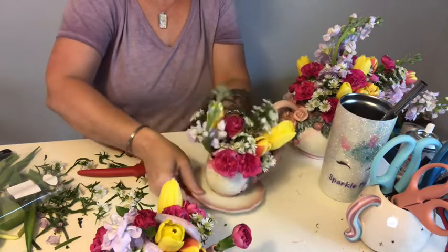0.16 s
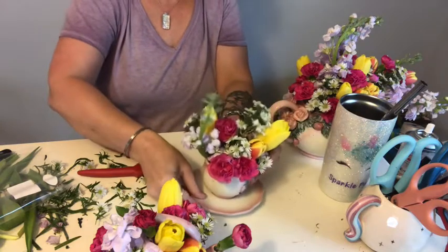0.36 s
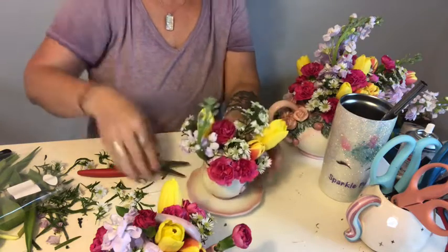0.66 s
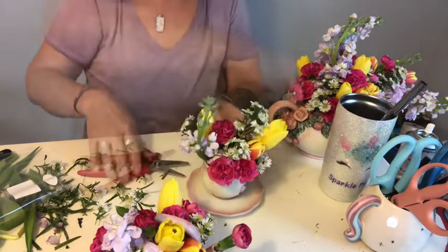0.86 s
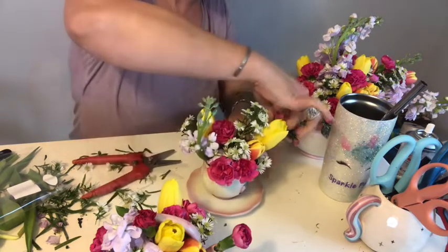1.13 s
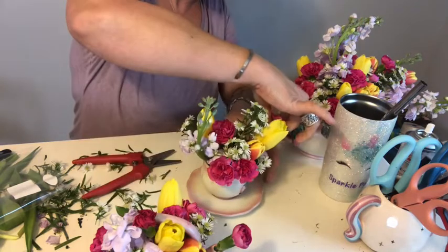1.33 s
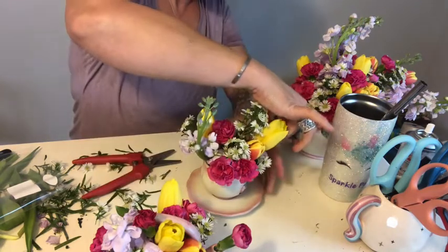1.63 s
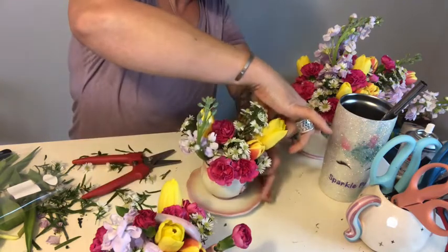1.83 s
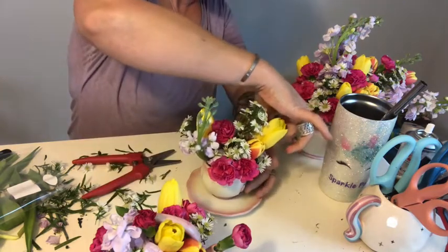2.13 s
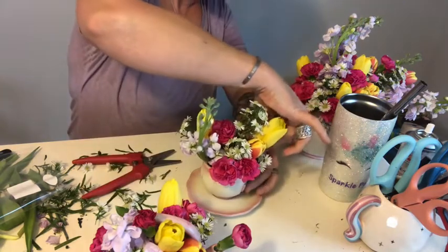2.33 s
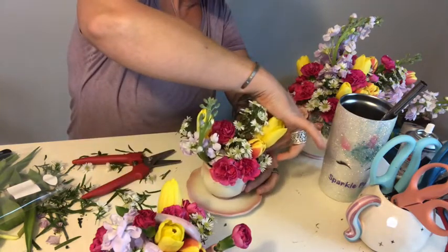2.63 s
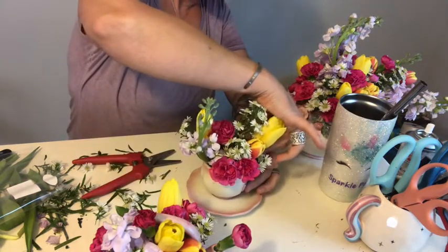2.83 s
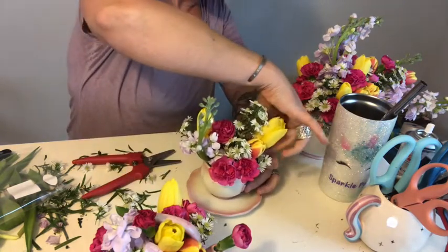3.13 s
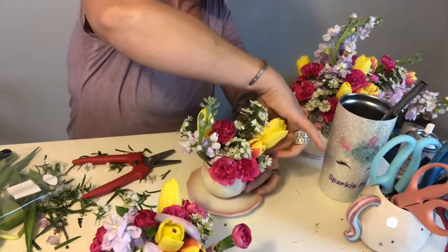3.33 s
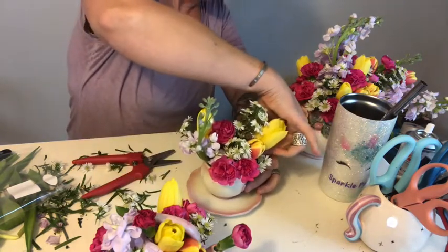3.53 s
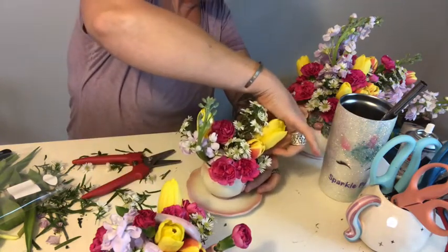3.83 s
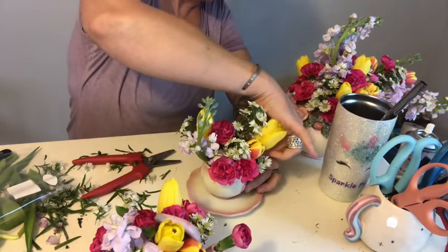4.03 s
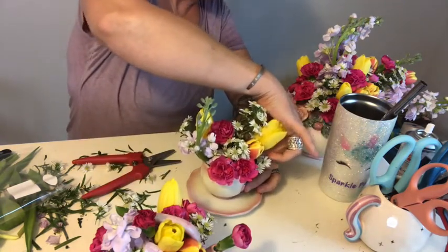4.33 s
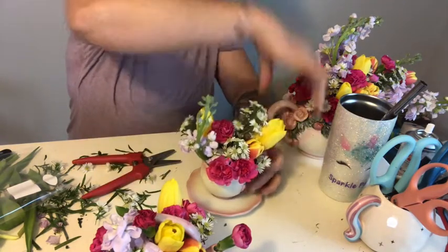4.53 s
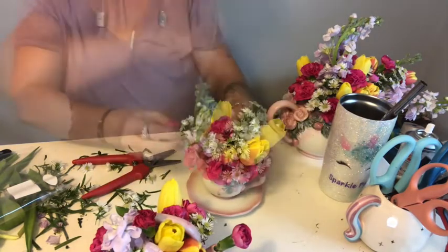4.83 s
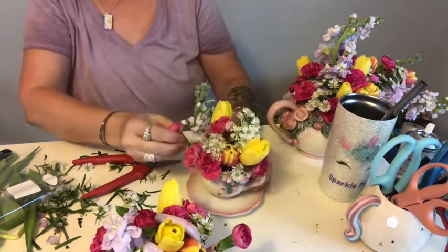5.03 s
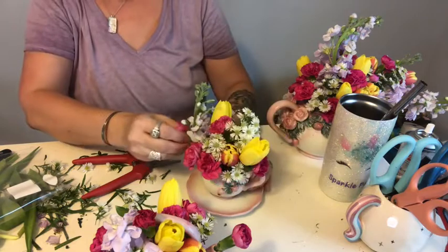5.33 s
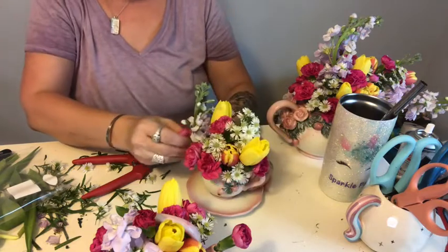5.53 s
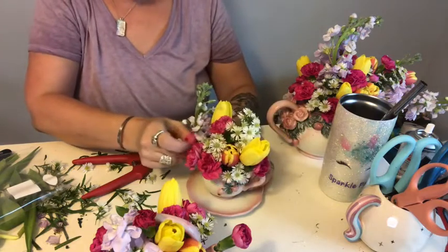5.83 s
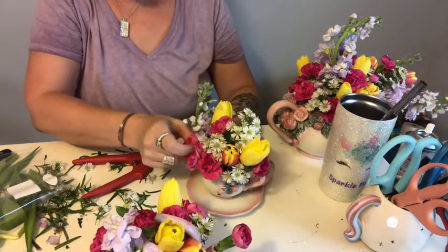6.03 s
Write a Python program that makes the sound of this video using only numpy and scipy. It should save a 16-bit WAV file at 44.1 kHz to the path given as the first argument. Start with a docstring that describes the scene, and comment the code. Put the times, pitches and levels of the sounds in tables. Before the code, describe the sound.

Close porcelain clinks and gritty rocking for two seconds, quiet petal rustling with faint bangle jingles, then sharp china clatter near five seconds.

```python
"""Close on a wooden worktable in a small room, over a fan's steady rumble and beating hum: shaped noise and sines.
A cup packed with flowers drags and clinks on its saucer at once, contacts driving shared china modes; blows ring
the table. A bangle jingles faintly as chattering grains through metal modes, with a few faint, very high tones.
Rocking and clinks go on until about two seconds, then mostly stems and leaves rustle, as patchy coloured grains.
A last flurry peaks near five seconds, and rustling sees it out; decaying noise gives the room's answer."""
import sys
import numpy as np
from scipy import signal
from scipy.fft import rfft, irfft, next_fast_len
from scipy.io import wavfile
from scipy.ndimage import uniform_filter1d, map_coordinates

SR = 44100
rng = np.random.default_rng(int(sys.argv[2]) if len(sys.argv) > 2 else 0)


def boost(x):
    """Linear amplitude factor 10**(x/20) for a level x in decibels (scalar or array-like)."""
    u = np.asarray(x, float) / 20
    return 10 ** u


def digitize_waveform(pressure):
    """Quantize a signal to 16-bit integers and store it at the path in sys.argv[1].

    Rows of a 2-D input are taken as channels; values are limited to [-1, 1].
    """
    field = np.atleast_2d(pressure).T
    bounded = np.clip(field, -1, 1)
    quanta = np.round(bounded * 32767).astype(np.int16)
    wavfile.write(sys.argv[1], SR, quanta)


N = 272160
t = np.arange(N) / SR

# lower modes of cup and saucer, rung by clinks, slides and knocks: centre_hz, width_hz, relative_db
BODY_MODES = [(490, 47, -4.5), (588, 100, -10), (726, 83, -3.5), (860, 110, 2.5), (1016, 170, 3.5),
              (1400, 170, -2.5), (1600, 240, 0), (1842, 330, -5.5)]


def unit(x):
    """Scale to rms 1."""
    return x / np.sqrt(np.mean(np.abs(x) ** 2) + 1e-20)


def along(points, hz):
    """Read (Hz, value) points on a log frequency axis."""
    f, value = np.transpose(points)
    return np.interp(np.log(hz + 1), np.log(f + 1), value)


def filtered(x, response):
    """Multiply the spectrum of x by a complex response of frequency."""
    size = next_fast_len(len(x) + 8192)
    hz = np.fft.rfftfreq(size, 1 / SR)
    return irfft(rfft(x, size) * response(hz), size)[:len(x)]


def ringing(x, modes):
    """Pass x through parallel resonances; a unit impulse leaves energy 1."""
    def bank(f):
        total = 0
        for k, (centre, width, db) in enumerate(modes):
            damping = 1j * f * width
            # neighbouring modes have opposite signs
            total = total + (-1) ** k * boost(db) * damping / (centre * centre - f * f + damping)
        return unit(total)
    return filtered(x, bank)


def coloured(x, spectrum):
    """Shape x to a spectrum, at rms 1."""
    return unit(filtered(x, lambda f: boost(along(spectrum, f))))


def dull(x, top_hz):
    """A soft contact passes little above top_hz: a second-order low-pass."""
    return filtered(x, lambda f: 1 / (1 - (f / top_hz) ** 2 + 1j * np.sqrt(2) * f / top_hz))


def grit(rate, spread_db):
    """Random tiny contacts of unequal size, rate a second, none far over the rest, rms 1."""
    size_db = spread_db * np.minimum(rng.exponential(size=N), 3)
    hits = rng.random(N) < rate / SR
    return unit(hits * rng.standard_normal(N) * boost(size_db))


def strokes(rows, rise_s, stop_db_per_s):
    """One level envelope per stroke: it rises from its start and dies away once its length is over."""
    start, length, db = np.transpose(rows)[:3, :, None]
    rise = np.clip((t - start) / rise_s, 0, 1) ** 2
    after = np.clip(t - start - length, 0, 1)
    return rise * boost(db - stop_db_per_s * after)


def blows(times, db, contact_s, rough=0.2):
    """One sharp push per blow and a rough wake dying over the contact time, which colours the modes anew."""
    u = np.arange(512)
    push = rough * rng.standard_normal((len(times), 512)) * np.exp(-u / (contact_s * SR))
    push[:, 0] = 1
    push *= (boost(db) / np.linalg.norm(push, axis=1))[:, None]
    # the contact closes a moment after first touch
    at = np.round((times + 0.0006) * SR).astype(int)[:, None] + u
    return np.bincount(at.ravel(), push.ravel(), N + 512)[:N]


def background():
    """Steady air and microphone hiss as shaped noise, motor hum as sines."""
    # room air and microphone hiss: frequency_hz, relative_db_per_hz
    air = [(30, -27), (42, -5.5), (65, -0.5), (85, -13.5), (110, -4.5), (190, -4.5), (400, -16.5),
           (500, -15.5), (1000, -22), (1500, -25.5), (2500, -32.5), (7000, -35), (14000, -41.5),
           (16500, -54)]
    # motor tones, the lowest two beating five times a second: frequency_hz, rms_db
    hum_tones = [(53.74, -67), (58.84, -65.5), (120.04, -71)]
    hum = sum(boost(db) * np.sqrt(2) * np.cos(2 * np.pi * hz * t) for hz, db in hum_tones)
    return hum + boost(-60) * coloured(rng.standard_normal(N), air)


def bangle():
    """Thin metal rings chatter: fading grains excite narrow modes, each jingle favouring its own."""
    # jingles, mode level given per pass: start_s, length_s, drive_db, lowest_mode_hz, lowest_mode_db
    jingles = [(0, 0.06, -62.5, 4430, 2), (0.061, 0.035, -43, 4510, 3.5), (.29, 0.095, -73.5, 4540, 9),
               (0.344, 0.074, -66, 4460, 1), (0.637, 0.11, -75, 4430, -9),
               (2.195, 0.092, -69.5, 4300, -3.5), (2.67, .012, -80, 4840, 16.5),
               (2.817, 0.039, -77, 4350, -3), (3.052, 0.026, -59.5, 4220, -1.2),
               (3.472, 0.012, -64, 4240, 3), (4.22, .09, -73.5, 4390, 4), (4.416, 0.028, -67.5, 4200, 0),
               (4.986, 0.11, -63, 4200, -6)]
    # upper modes for one pass: centre_hz, width_hz, relative_db
    upper_modes = [(7050, 160, 0), (9550, 80, -9), (10500, 110, -4), (11400, 110, -8), (12100, 80, -10)]
    out = np.zeros(N)
    grains = grit(rate=1000, spread_db=1.5)
    u = t[:SR // 4]
    for start, length, db, low_hz, low_db in jingles:
        first = round(start * SR)
        at = slice(first, first + len(u))
        # steady for half the length, then fading to nothing
        chatter = np.clip(2 - 2 * u / length, 0, 1) * grains[at]
        favoured = [(hz, width, mode_db + rng.normal(0, 2)) for hz, width, mode_db in upper_modes]
        modes = [(low_hz, 130, low_db)] + favoured
        # twice: clean valleys between the modes
        out[at] += boost(db - 10.5) * ringing(ringing(chatter, modes), modes)
    return out


def high_tones():
    """Faint narrow tones near 15.5 kHz: fine grains through two narrow modes, twice."""
    # tones: start_s, length_s, drive_db
    times = [(.06, .03, -90), (1.865, 0.014, -85), (3.045, .02, -96), (4.99, 0.08, -80)]
    # modes for one pass: centre_hz, width_hz, relative_db
    modes = [(15400, 150, -5), (15700, 60, -1.5)]
    envelope = strokes(times, rise_s=.008, stop_db_per_s=699.5).sum(axis=0)
    return ringing(ringing(envelope * grit(rate=1500, spread_db=2.5), modes), modes)


def rustle():
    """Petals and leaves brush each other: dense fine grains in shifting patches."""
    # brushes, crispness from soft petals 0 to stiff leaves 1: start_s, length_s, level_db, crispness
    brush_rows = [(0, 0.098, -65.5, 0.88), (.2, .35, -72, .33), (0.591, 0.14, -65.5, .35),
                  (.73, 0.085, -60.5, 0.42), (1.105, .45, -80, .4), (1.6, 0.18, -65.5, .4),
                  (1.86, 0.318, -66, 0.24), (2.308, .22, -66.5, 0.37), (2.93, 0.054, -61, .57),
                  (3.14, 0.045, -68, 0.24), (3.88, 0.067, -61.5, .46), (4.19, 0.099, -82, .5),
                  (4.31, 0.03, -55.5, 0.62), (4.434, 0.21, -77.5, 0.43), (5.21, 0.34, -69.5, .5),
                  (5.43, 0.124, -69, 0.51), (5.565, .13, -64, .3), (5.85, 0.099, -71, .65),
                  (6.03, .08, -72.5, .65)]
    # soft petals' colour: frequency_hz, relative_db_per_hz
    petals = [(1200, -30), (2000, -9), (4500, 1), (7000, -6), (10000, -20), (16000, -35)]
    # stiff leaves' colour: frequency_hz, relative_db_per_hz
    leaves = [(1200, -29.5), (2000, -0.5), (5000, -13.5), (10000, -4), (14000, -8), (16500, -15.5)]
    brushes = strokes(brush_rows, rise_s=0.071, stop_db_per_s=250.5)
    level = brushes.sum(axis=0) + 1e-12
    crisp = np.clip(np.transpose(brush_rows)[-1], 0, 1) @ brushes / level
    grains = grit(rate=12000, spread_db=0)
    mixed = (1 - crisp) * coloured(grains, petals) + crisp * coloured(grains, leaves)
    z = signal.stft(mixed, nperseg=512)[2]
    # random gains smoothed across frequency, then time
    patches = uniform_filter1d(rng.standard_normal(z.shape), size=14, axis=0)
    patches = uniform_filter1d(patches, size=10, axis=1)
    depth_db = 1.6
    patchy = signal.istft(z * boost(depth_db * unit(patches)), nperseg=512)[1][:N]
    return level * unit(patchy)


def slides():
    """The cup's foot sticks and slips as it drags: juddering grit pushes body and rim."""
    # drags over the saucer: start_s, length_s, body_drive_db, rim_against_body_db
    drags = [(0.028, 0.12, -48.5, -1), (0.143, 0.082, -51.5, -0.5), (0.575, 0.15, -56, -8.5),
             (0.72, 0.099, -53, -4), (1.065, .15, -59, -6), (1.266, 0.067, -52, -0.5),
             (1.33, 0.085, -58, -4.5), (1.468, 0.2, -49.5, -8), (1.66, 0.1, -56.5, -3),
             (1.875, 0.054, -69, 9), (1.942, 0.31, -67, -12), (4.498, .05, -56, -4),
             (4.562, 0.074, -53, -8), (4.67, 0.07, -60.5, 0.7), (4.775, 0.033, -66.5, -0.5),
             (4.876, 0.21, -59, -18), (4.968, 0.097, -53.5, 9), (5.055, 0.11, -70, 5)]
    judder_db, judders_per_s = 4, 45
    judder = map_coordinates(rng.standard_normal(500), [t * judders_per_s])
    drag = strokes(drags, rise_s=.03, stop_db_per_s=300.5) * unit(boost(judder_db * judder))
    body = drag.sum(axis=0) * grit(rate=2700, spread_db=2.5)
    rim = boost(np.transpose(drags)[-1]) @ drag * grit(rate=1900, spread_db=4.5)
    return body, rim


def clinks():
    """Each china contact pushes body, rim and hard edge, the higher modes for a shorter time."""
    # contacts, before each part's drive gain: start_s, rim_db, body_against_rim_db, edge_against_rim_db
    contacts = [(.054, -33.5, -13, -29), (.0834, -27, -5.5, -16), (.1004, -37, -12, -7),
                (.1082, -32, -10, -28), (.1246, -21, -23, -24.5), (.1384, -25, -22, -40),
                (.1474, -25.5, -13, -36.5), (.1614, -32.5, -7, -32), (.6264, -56.5, -21, -3),
                (.7304, -50, -3, -18), (.7532, -35.5, -10, -13), (.7701, -27, -11.5, -10.5),
                (1.0026, -47, -10.5, -28.5), (1.05, -35.5, 3, -34), (1.1343, -44, -12, -25),
                (1.1598, -49, 2, -15), (1.2106, -34, 3, -11), (1.2575, -19, -12.5, -36),
                (1.2705, -21, -5, -37), (1.3604, -53, 1.5, -23), (1.4007, -49, 5.5, -31),
                (1.4701, -47, -2.5, -12.5), (1.5005, -51, 4, -36.5), (1.508, -45.5, 5, -38),
                (1.5219, -34, -3, -27), (1.5878, -48, -5, -22), (1.5934, -47.5, -11, -10),
                (1.6053, -38, -4.5, -24), (1.6397, -40, 3, -26), (1.6444, -41.5, 2.5, -14),
                (1.6554, -45.5, -10, -10), (1.6644, -44.5, -5, -16.5), (1.715, -40.5, -5, -31),
                (1.737, -38.5, -13, -9.5), (1.7599, -39, -0.5, -26), (1.8826, -45.5, -6, -14),
                (1.8896, -32, -29, -12), (1.8934, -32.5, -12.5, -15), (1.9104, -37, -15, -21),
                (2.0737, -53, -7, -11), (2.0951, -37, -7, -33), (2.1004, -34.5, -20, -11),
                (3.0584, -52.5, -0.5, -6.5), (4.3191, -52.5, -11, -1.5), (4.5764, -58, 14, -15),
                (4.5905, -52, -7, -8), (4.6224, -48, 2, -20), (4.6354, -43.5, 4, -14.5),
                (4.6693, -28.5, -9, -16), (4.7142, -47, 2.5, -16), (4.7414, -49, 3, -14),
                (4.7501, -41.5, -2.5, -38), (4.9831, -42.5, -0.5, -34), (4.9896, -20.5, -13, -23),
                (4.9995, -15, -9.5, -34), (5.022, -20.5, -13, -28), (5.0344, -24, -15, -33.5),
                (5.0414, -26, -16, -25), (5.0544, -38, -7, -15), (5.8885, -64, -12, 5)]
    s, rim_db, body_db, edge_db = np.transpose(contacts)
    # the added dB set how strongly a contact drives each set of modes
    body = blows(s, rim_db + body_db + 23, contact_s=.001)
    rim = blows(s, rim_db + 15, contact_s=.0005)
    edge = blows(s, rim_db + edge_db + 20, contact_s=.0003)
    return body, rim, edge


def china():
    """Clinks and the gritty drag of the cup's foot drive the same modes of cup and saucer."""
    # rim modes: centre_hz, width_hz, relative_db
    rim_modes = [(2364, 140, 0.5), (3095, 170, 6.5), (3310, 310, -4), (4025, 330, 5), (4420, 600, -8),
                 (4675, 150, 3), (5100, 275, -19), (6370, 430, -13), (3700, 3600, -4)]
    # hard-edge modes: centre_hz, width_hz, relative_db
    edge_modes = [(7350, 940, 4.5), (9600, 1100, -5.5), (10760, 820, -2), (13500, 2800, -16.5),
                  (14930, 370, -7.5)]
    slide_body, slide_rim = slides()
    clink_body, clink_rim, clink_edge = clinks()
    body = dull(ringing(clink_body + slide_body, BODY_MODES), top_hz=2640)
    rim = dull(ringing(clink_rim + slide_rim, rim_modes), top_hz=7450)
    return body + dull(rim, top_hz=8030) + ringing(clink_edge, edge_modes)


def knocks():
    """Soft blows ring the table top and the saucer's body, not its rim."""
    # blows, before each part's drive gain: start_s, table_db, saucer_body_db
    table_blows = [(0.063, -23, -22), (0.067, -14.5, -7.5), (0.364, -23.5, -23.5), (0.605, -38.5, -63),
                   (0.816, -32.5, -32), (0.823, -56, -34.5), (0.845, -41.5, -52), (4.355, -42.5, -49.5),
                   (4.411, -39, -49), (4.424, -39.5, -41.5), (4.43, -56.5, -48.5), (4.804, -45.5, -60)]
    # table-top modes: centre_hz, width_hz, relative_db
    wood_modes = [(121, 51.3, -7), (204.1, 80, -2.5), (275, 66, 1), (440, 58, -4), (550.4, 120, -4.5)]
    s, table_db, body_db = np.transpose(table_blows)
    wood = ringing(blows(s, table_db + 16.5, contact_s=0.00336, rough=0.15), wood_modes)
    saucer = ringing(blows(s, body_db + 17.0, contact_s=0.0028, rough=0.092), BODY_MODES)
    return dull(dull(wood + saucer, top_hz=1580), top_hz=1930)


def room(x):
    """Each frequency of the room's answer, a burst of noise, dies at its own speed."""
    # decay of the small room: frequency_hz, t60_s
    decay = [(150, 0.36), (1000, 0.25), (4000, 0.15), (12000, 0.088)]
    hz, u, z = signal.stft(rng.standard_normal(SR // 2), SR, nperseg=256)
    fall = boost(-60 * u / along(decay, hz)[:, None])
    tail = signal.istft(z * fall, SR, nperseg=256)[1]
    late = np.pad(x, (150, 0))  # the answer starts 150 samples late
    return signal.fftconvolve(late, tail / np.linalg.norm(tail))[:N]


def scene():
    """Everything on the table shares the room; the steady background is added dry."""
    near = bangle() + high_tones() + rustle() + china() + knocks()
    return (near + boost(-10) * room(near) + background())[None]


def low_pass(x):
    """Removes everything above the highest recorded frequency."""
    return signal.sosfilt(signal.butter(12, 16770, fs=SR, output="sos"), x)


def record(dry):
    """The microphone drops the deepest bass: four first-order high-passes at 30 Hz."""
    mix = filtered(dry[0], lambda f: (1j * f / (30 + 1j * f)) ** 4)[None]
    return low_pass(mix)


dry = scene()
out = record(dry)
digitize_waveform(out)
```